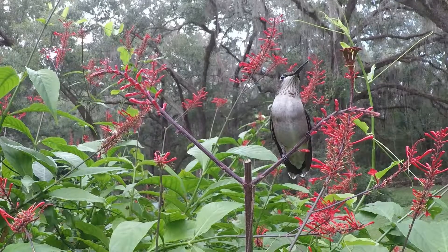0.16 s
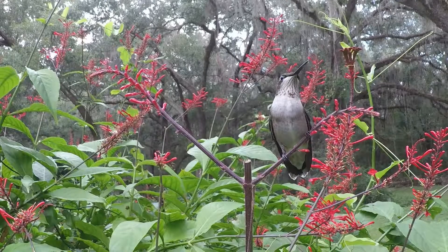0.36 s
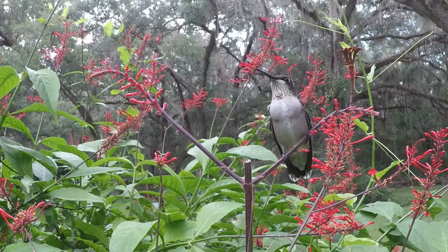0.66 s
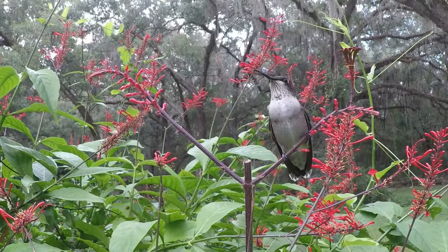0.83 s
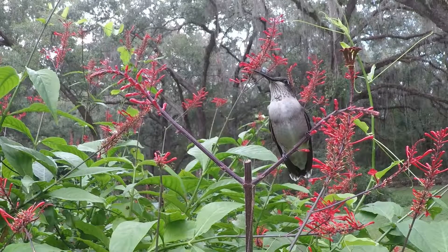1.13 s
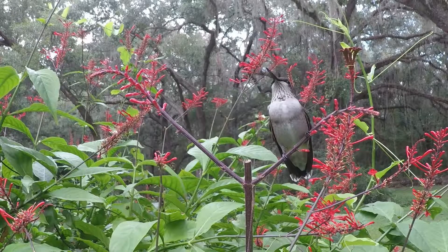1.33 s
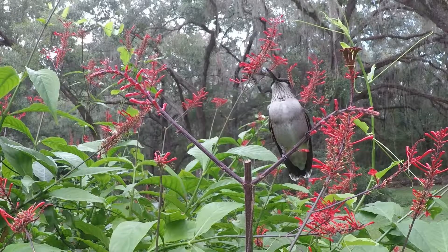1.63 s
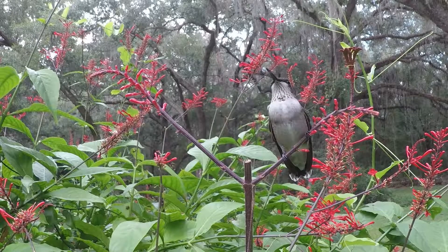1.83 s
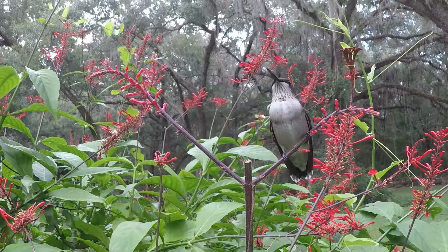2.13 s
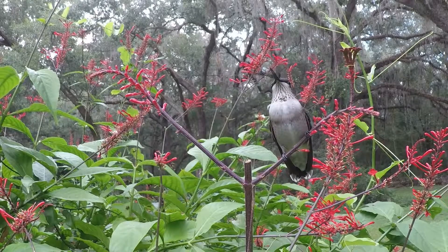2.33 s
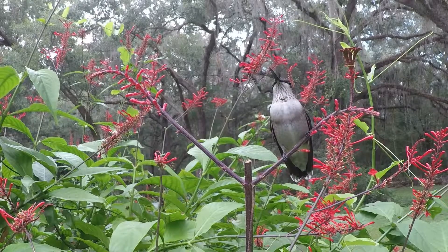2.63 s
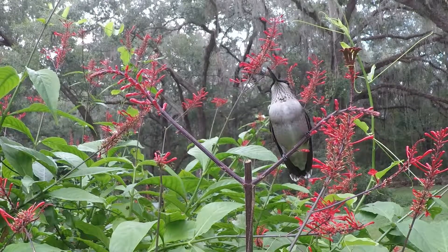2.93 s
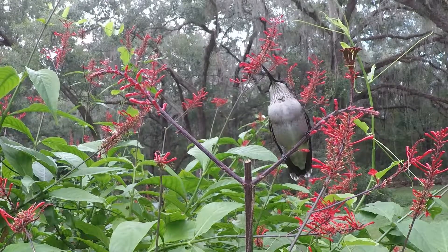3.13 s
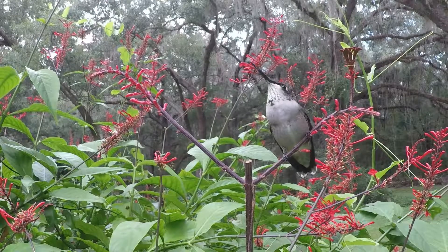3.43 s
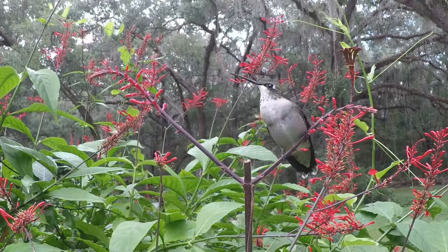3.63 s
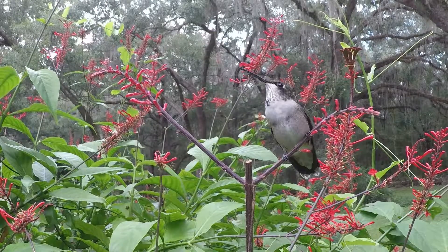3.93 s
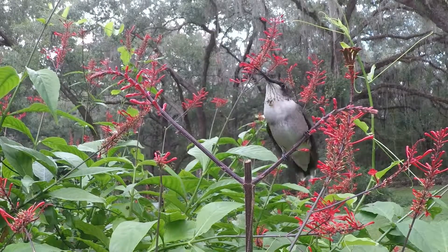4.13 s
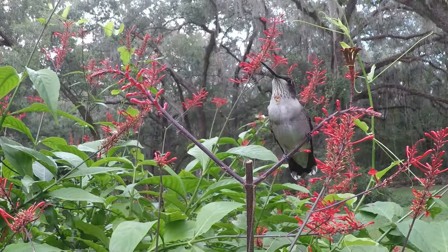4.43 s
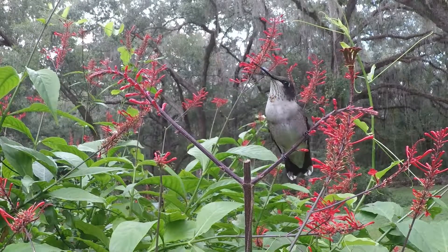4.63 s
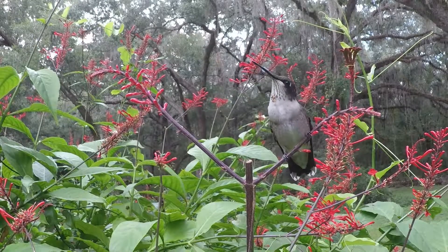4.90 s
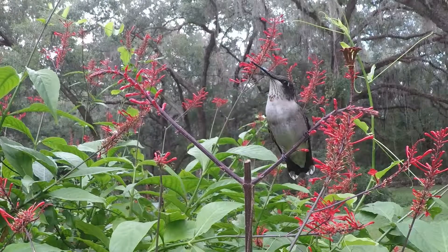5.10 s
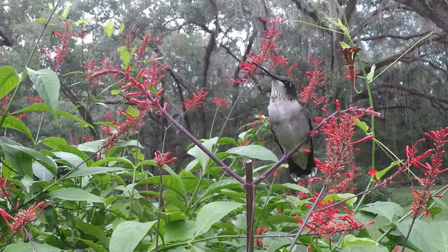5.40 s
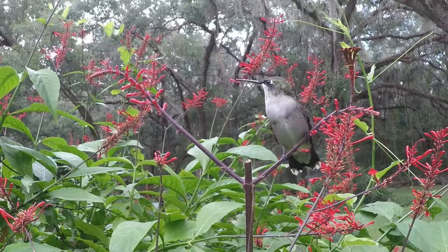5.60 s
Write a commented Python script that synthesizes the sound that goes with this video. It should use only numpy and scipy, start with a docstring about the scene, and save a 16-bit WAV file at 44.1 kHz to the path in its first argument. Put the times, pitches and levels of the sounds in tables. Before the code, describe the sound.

A deep, soft rumble of distant traffic with low hums and a thin hiss of leaves runs throughout, slightly stronger at first. From 0 to 1 s a faint low engine note rises and fades. Barely audible far birds give thin high whistles and small chips from 0.15 to 1.4 s; a soft hollow wooden double or triple knock sounds far off near 1.15 s. More faint, echoing whistles, a small trill and chips come between 1.9 and 3.05 s. At 3.3 s the close hummingbird suddenly dominates: two very short piercing squeaks, falling at their ends. After a pause, at 3.8 s comes another squeak, a quick rough trill, two falling buzzes around 4.0 and 4.07 s, then five crisp descending chips from 4.14 to 4.4 s. They are dry with slight leafy and woodland echo. Another engine rise lasts from 4 to 5.5 s, with one almost inaudible far whistle at 5.25 s.

```python
"""Hummingbird on a twig

A nearby hummingbird whistles, trills, buzzes and chips; others answer from farther off. Each note is a
pitch curve sung by a stack of overtones, coloured by a throat and echoed by leaves and trees.
Shaped noise makes distant traffic and leaf hiss, sine tones make two hums and an engine that twice pulls
up in pitch, and short ringing tones make something wooden knock far away."""
import sys
import numpy as np
from scipy import signal
from scipy.fft import rfft, irfft
from scipy.io import wavfile
from scipy.ndimage import uniform_filter1d

SR = 44100
rng = np.random.default_rng(int(sys.argv[2]) if len(sys.argv) > 2 else 0)


def master_out(mix):
    """Clip the mix to full scale and print it as 16-bit PCM to the path in sys.argv[1]."""
    frames = np.transpose(np.atleast_2d(mix))
    ceiling = np.clip(frames, -1, 1)
    pcm = np.round(ceiling * 32767).astype(np.int16)
    wavfile.write(sys.argv[1], SR, pcm)


N = 254016  # length in samples
EDGE_HZ = 14640  # top of the sound band


def gain_of(db):
    """Turn decibels into a multiplier."""
    return 10 ** (np.asarray(db) / 20)


def evened(x):
    """Scale to an rms of 1."""
    return x / np.sqrt(np.mean(x ** 2) + 1e-20)


def read(points, hz):
    """Read a curve between its points, on a logarithmic frequency scale."""
    f, value = np.transpose(points)
    return np.interp(np.log(hz + 1), np.log(f + 1), value)


def add(mix, s, sound):
    """Lay a sound into the mix at time s, cut off at the end of the mix."""
    part = mix[..., round(s * SR):][..., :sound.shape[-1]]
    part += sound[..., :part.shape[-1]]


def wander(count, size):
    """Slow random drift of rms 1, smooth over size samples."""
    smooth = uniform_filter1d(rng.standard_normal(count), size)
    return evened(uniform_filter1d(smooth, size))


def echoes(x, t60, gap_s):
    """Dense scattered echoes as fading noise after a short gap, different in each ear."""
    t = np.arange(SR // 2) / SR
    tail = rng.standard_normal((2, len(t))) * gain_of(-60 * t / t60) * (t > gap_s)
    tail /= np.linalg.norm(tail, axis=1, keepdims=True)
    return signal.fftconvolve(x[None], tail, axes=1)[:, :N]


def grove(x):
    """Echoes off the trees, which take 0.45 s to die away by 60 dB."""
    return echoes(x, t60=0.45, gap_s=0.0015)


# How alike the rumble is at two microphone ports close together: f/Hz, likeness (0-1)
PORT_LIKENESS = [(60, .9995), (250, .985), (500, .88), (1000, .72), (1500, .55), (2400, .2), (14000, .1)]
# How far the left port is ahead (negative: behind): f/Hz, lead/rad
PORT_LEAD = [(30, -.05), (90, -.09), (180, -.2), (360, -.4), (600, -.75), (950, -3.3), (1550, -4),
             (2500, -5)]
# How much louder the left port is than the right: f/Hz, level/dB
PORT_BALANCE = [(60, -1.0), (110, -1.0), (200, -1.5), (370, -4.0), (680, -10.0), (1240, -5.5), (2280, -0.5),
                (4180, -0.5), (7660, -0.5), (14000, -1.0)]


def ports(z, other, hz):
    """One sound field as two ports take it: partly shared, partly independent at each frequency."""
    same = np.clip(read(PORT_LIKENESS, hz), 0, 1)
    side = gain_of(read(PORT_BALANCE, hz) / 2)
    shared = same * z * np.exp(-1j * read(PORT_LEAD, hz))
    right = shared + np.sqrt(1 - same ** 2) * other
    return np.array([z * side, right / side])


# Tone colour of the traffic and leaf hiss, before its overall level is set: f/Hz, level per Hz/dB
RUMBLE_COLOUR = [(12, -36), (28, -8), (48, 1), (70, -3), (105, -6), (165, -17), (300, -21), (500, -24.5),
                 (720, -34.5), (1100, -40), (2000, -52), (3400, -60), (9700, -60.5), (14500, -72.5)]
# Faint steady bands, likely insects: f/Hz, width/Hz, level over the hiss/dB
WHINES = [(2300, 120, 4), (4500, 150, 3), (6400, 900, 2)]
# Slow swells, each taken about its own average: t/s, deep rumble level/dB, traffic wash level/dB
SWELLS = [(0, 2, 1), (1.5, 1, .5), (3, -1, 0), (4.5, 0, -.5), (5.76, -2, -.5)]
RUMBLE_DB = -22


def rumble(patchy_db=0.31):
    """Far traffic and the hiss of leaves: random short-time spectra with faint patches and slow swells."""
    hop = 512  # samples between spectra
    frames, hz = N // hop + 5, np.fft.rfftfreq(2048, 1 / SR)[:, None]
    a, b, c, d, patches = rng.standard_normal((frames, 1025, 5)).T
    patches = uniform_filter1d(patches, size=20, axis=0)  # smooth over frequency
    patches = evened(uniform_filter1d(patches, size=6, axis=1))  # smooth over time
    s, *levels = np.transpose(SWELLS)
    frame_s = np.arange(frames) * hop / SR
    deep_db, wash_db = (np.interp(frame_s, s, v - v.mean()) for v in levels)
    deep = 1 / (1 + (hz / 110.) ** 2)  # share that follows the deep swell
    swell_db = deep * deep_db + (1 - deep) * wash_db / (1 + (hz / 6900.0) ** 2)
    whine_db = sum(db * np.exp(-((hz - f) / width) ** 2) for f, width, db in WHINES)
    colour_db = read(RUMBLE_COLOUR, hz) + whine_db + swell_db + patchy_db * patches
    z = ports(a + 1j * b, c + 1j * d, hz) * gain_of(colour_db)
    noise = signal.istft(z, nperseg=2048, noverlap=2048 - hop)[1][:, :N]
    return gain_of(RUMBLE_DB) * evened(noise)


# Two hums, before their levels waver: f/Hz, level/dB, phase drift (rms)/rad
HUMS = [(59.28, -31, 1), (48.12, -31, 2.85)]
# The engine pulls up, before fading and wavering: t/s, length/s, start f/Hz, end f/Hz, level/dB
ENGINE_PULLS = [(0, 0.957, 102.6, 122.8, -26), (4.0, 1.5, 100.5, 119.4, -26)]
PULL_RISE_S, PULL_FADE_DB, PULL_WAVER_DB = 0.12, -10.5, 2  # edge time, level change by the end, rms waver


def drones():
    """Sine tones: two wavering hums and the engine's rising, fading note."""
    t, out = np.arange(N) / SR, np.zeros(N)
    for hz, db, drift in HUMS:
        level = gain_of(db + 1.9 * wander(N, size=6000))
        out += level * np.sin(2 * np.pi * hz * t + drift * wander(N, size=9000))
    for s, length, hz0, hz1, db in ENGINE_PULLS:
        part = np.arange(0, length, 1 / SR)
        u = part / length
        level_db = db + PULL_FADE_DB * u ** 2 + PULL_WAVER_DB * wander(len(part), size=4000)
        edges = np.clip(np.minimum(part, part[::-1]) / PULL_RISE_S, 0, 1)
        turns = np.cumsum(hz0 + (hz1 - hz0) * u) / SR
        add(out, s, gain_of(level_db) * edges * np.sin(2 * np.pi * turns))
    return np.sqrt(2) * out * gain_of([[-.45], [.45]])  # left, right


# Where each bird sits and how that changes its notes. Columns: echo level/dB, left-right level/dB,
# brightness/dB per octave, share of the throat's colour heard, level change over a whistle's plunge/dB,
# end of a chip as share of its start pitch, bend of a chip's fall (0 = straight)
BIRDS = {"near": (-22.5, 1, 0, 1, -4, 0.53, 0.72), "middle": (-3.5, 3, 4, 0.84, -22, 0.53, -0.25),
         "far": (1.5, 1, 6, 1, -22, .76, -0.3)}
# Strength of each overtone of the vibrating membrane, lowest first: level/dB
OVERTONES_DB = [1, -5.5, -6.5, -11.5, -17.5, -18, -19, -25]
# How the windpipe and beak colour the tone: f/Hz, level/dB
THROAT = [(1200, -23), (1900, -18), (2600, -11), (4000, -13), (5400, -10), (6300, -1.5), (6700, 0),
          (7500, -4.5), (8200, -18), (8900, -15), (9600, -14), (10500, -29), (12800, -15.5), (14500, -43)]
THROAT_TOP_HZ = 6700  # brightness tilts about the throat's peak
GRAIN = .018  # fine random grain on every note's level, share of the tone


def voice(hz, db, bird, rise_s=0.0021, fall_s=0.0021):
    """Overtones of a membrane follow the pitch curve, each coloured by the throat it passes.
    Fast random level changes roughen it a little; moving air makes far notes waver."""
    echo_db, _, bright_db, colour = BIRDS[bird][:4]
    count, far = len(hz), gain_of(echo_db)
    t = np.arange(count) / SR
    speed = uniform_filter1d(abs(np.gradient(np.log(hz))) * SR, size=60)  # quick slides roughen the tone
    shake = (0.0029 + .00006 * speed) * wander(count, size=12)
    air = .012 * far * wander(count, size=250)
    turns = np.cumsum(hz * (1 + shake + air)) / SR
    tones = np.zeros(count)
    for k, over_db in enumerate(OVERTONES_DB, 1):
        tilt_db = bright_db * np.log2(k * hz / THROAT_TOP_HZ)
        level = gain_of(over_db + colour * read(THROAT, k * hz) + tilt_db)
        tones += level * (k * hz < EDGE_HZ) * np.sin(2 * np.pi * k * turns)
    rough = .025 * np.sqrt(speed / 30.) * wander(count, size=6)
    tones *= 1 + rough + GRAIN * wander(count, size=2)
    edges = np.sin(np.pi / 2 * np.clip(np.minimum(t / rise_s, t[::-1] / fall_s), 0, 1)) ** 2
    waver_db = (0.14 + 3.7 * far) * wander(count, size=200)
    return np.sqrt(2) * gain_of(db + waver_db) * edges * tones


# Instants at which the voice catches: t/s, level change/dB
CATCHES = [(3.3472, -14), (3.8145, -8)]
CATCH_S = .0001  # width of a catch
PLUNGE_S, PLUNGE_HZ = .008, 1600  # how long a whistle's end takes and where it lands
# Held notes that plunge at the end, with start levels before colouring:
# t/s, bird, length/s, start f/Hz, end f/Hz, sag in the middle/Hz, level/dB, growth/dB
WHISTLES = [(.153, "far", 0.087, 6740, 6850, -1, -57.5, -0.5), (.317, "far", .077, 6580, 6420, 0, -63, 0),
            (0.93, "far", .062, 6450, 6290, 0, -63.5, 2), (1.893, "middle", 0.056, 7000, 7130, 0, -51, 4.5),
            (2.08, "middle", .02, 6900, 6680, 0, -58.5, 4.5),
            (3.3205, "near", 0.034, 6660, 6120, -73, -16, 3.5),
            (3.408, "near", .0305, 6510, 5640, -110, -18, 0.5),
            (3.8042, "near", 0.025, 6660, 6130, 295, -18.5, 5.5),
            (5.251, "far", 0.14, 6800, 7080, 0, -66.5, -2)]


def whistle(s, bird, length, hz0, hz1, sag_hz, db, growth_db):
    """A gliding tone; then the membrane slackens and the pitch falls away."""
    t = np.arange(0, length + PLUNGE_S, 1 / SR)
    u = np.minimum(t / length, 1)
    slack = np.clip((t - length) / PLUNGE_S, 0, 1)
    held_hz = hz0 + (hz1 - hz0) * u - 4 * sag_hz * u * (1 - u)
    hz = PLUNGE_HZ + (held_hz - PLUNGE_HZ) * (1 - slack) ** 2.1
    catch_db = sum(dip_db * np.exp(-((s + t - at) / CATCH_S) ** 2) for at, dip_db in CATCHES)
    plunge_db = BIRDS[bird][4] * np.sqrt(slack)
    return s, bird, voice(hz, db + growth_db * u + plunge_db + catch_db, bird)


# Short falling notes, with start levels before colouring: t/s, bird, length/s, start f/Hz, level/dB
CHIPS = [(.386, "far", .014, 2610, -54), (.47, "far", .016, 2500, -51), (.539, "far", .013, 2600, -51),
         (.655, "far", .013, 2650, -54), (.845, "far", .013, 2500, -55), (1.093, "far", .016, 2750, -51),
         (1.153, "far", .014, 2750, -52), (1.211, "far", .014, 2800, -52), (1.276, "far", .014, 2600, -54),
         (1.341, "far", .014, 2600, -54), (1.411, "far", .014, 2450, -56),
         (2.296, "middle", 0.016, 2600, -52), (2.348, "middle", .015, 2600, -52),
         (2.402, "middle", .016, 2680, -49), (2.756, "middle", 0.02, 2650, -45),
         (2.809, "middle", 0.022, 2730, -45), (2.874, "middle", .018, 2700, -44),
         (2.945, "middle", 0.018, 2690, -46), (3.031, "middle", 0.012, 2420, -50),
         (4.136, "near", 0.018, 2500, -14), (4.189, "near", 0.018, 2524, -14),
         (4.244, "near", .019, 2394, -14.5), (4.3073, "near", .019, 2360, -14),
         (4.3774, "near", 0.018, 2324, -14.5)]


def chip(s, bird, length, hz0, db):
    """A low falling note rich in overtones; positive bend steepens its start and end, negative its middle."""
    end, bend = BIRDS[bird][5:]
    u = np.arange(0, length, 1 / SR) / length
    bent = .66 * np.exp(-u / .13) + .34 * (1 - u ** 4)
    fall = (1 - bend) * (1 - u) + bend * bent
    hz = hz0 * (end + (1 - end) * fall)
    return s, bird, voice(hz, db - 1.6 * u, bird, rise_s=0.0042, fall_s=0.003)


def warble(kind, s, bird, length, rate1, done, top0, top1, low0, low1, db):
    """The membrane's pitch swings ever slower between a sinking top and bottom."""
    rate0, round_top, growth_db, swell_db = kind
    u = np.arange(0, length, 1 / SR) / length
    swing = (done + np.cumsum(rate0 + (rate1 - rate0) * u ** 2) / SR) % 1
    zigzag = 1 - abs(2 * swing - 1)
    arches = 1 - (1 - zigzag) ** 2.3  # round tops, sharp dips
    height = (1 - round_top) * zigzag + round_top * arches
    top, low = top0 + (top1 - top0) * u, low0 + (low1 - low0) * u
    hz = low + (top - low) * uniform_filter1d(height, size=round(SR / rate0 / 12))
    return s, bird, voice(hz, db + growth_db * u + swell_db * np.sin(np.pi * u), bird)


# How a buzz swings: start rate/swings per s, roundness of the tops (0 = pointed), growth/dB, middle swell/dB
BUZZ_SWING = (241, .1, 1.3, .6)
# Fast swinging notes, with levels before growth, swell and colouring: t/s, bird, length/s,
# end rate/swings per s, share of a swing done at the start, top f/Hz at start, at end,
# bottom f/Hz at start, at end, level/dB
BUZZES = [(.735, "far", .03, 220, .4, 7700, 7100, 6300, 5600, -62.5),
          (2.67, "middle", .038, 200, .3, 5500, 5200, 4820, 3900, -58),
          (3.9968, "near", .033, 201.5, -0.163, 5250, 3440, 2367, 1790, -16.5),
          (4.0713, "near", 0.028, 161, 0.1, 4880, 2440, 2250, 1490, -17.5)]


def buzz(*row):
    """A pitch that zigzags so fast that it is heard as a buzz."""
    return warble(BUZZ_SWING, *row)


# Blows on something wooden: t/s, level/dB
KNOCKS = [(1.125, -38), (1.161, -28), (1.178, -32.5)]
# Hollow tones that each blow rings: f/Hz, level/dB, time to fade by 60 dB/s
KNOCK_MODES = [(540, 1, 0.13), (600, 0, .07), (675, 3.5, 0.048), (796, 2.5, 0.043), (934, 1.5, 0.044)]


def knocks(echo_db=-3., rise_s=.003):
    """Soft blows ring a few hollow modes, smeared by the trees."""
    t, out = np.arange(SR // 4) / SR, np.zeros(N)
    rise = np.sin(np.pi / 2 * np.minimum(t / rise_s, 1)) ** 2
    for s, db in KNOCKS:
        ring = sum(gain_of(mode_db - 60 * t / t60) * np.sin(2 * np.pi * (hz * t + rng.random()))
                   for hz, mode_db, t60 in KNOCK_MODES)
        add(out, s, gain_of(db) * ring * rise)
    return (out + gain_of(echo_db) * grove(out)) * gain_of([[-5.], [3.]])  # left, right


# How a trill swings: start rate/swings per s, roundness of the tops (0 = pointed), growth/dB, middle swell/dB
TRILL_SWING = (92.5, 1.2, -4, 8)
# Slower swinging notes, with the same columns as the buzzes: t/s, bird, length/s,
# end rate/swings per s, share of a swing done at the start, top f/Hz at start, at end,
# bottom f/Hz at start, at end, level/dB
TRILLS = [(2.501, "middle", 0.066, 68, .25, 6980, 6650, 6470, 5200, -56.5),
          (3.864, "near", 0.07, 72, .145, 6740, 6360, 4710, 1250, -19.5)]


def trill(*row):
    """A pitch that swings in arches with sharp dips."""
    return warble(TRILL_SWING, *row)


# How much louder the birds are at the left port: f/Hz, level/dB
PERCH_BALANCE = [(1500, -2.5), (3000, -3), (4500, 0.5), (6500, 3.5), (9000, -5.5), (13000, -1)]
# How far the left port is ahead for the birds: f/Hz, lead/rad
PERCH_LEAD = [(3000, 0.2), (6500, 0.34), (7500, 1.86), (9000, 0.59), (12000, 0.57)]
BUSH_T60, BUSH_DB = .035, -13  # leaves right around a bird: echo fade in s, level in dB
LOWEST_HZ = 1150  # so small a body radiates little below this


def birds():
    """Every note straight to the microphones, off the leaves close by, and off the trees."""
    direct, to_trees = np.zeros((2, N)), np.zeros(N)
    notes = [whistle(*r) for r in WHISTLES] + [trill(*r) for r in TRILLS]
    notes += [buzz(*r) for r in BUZZES] + [chip(*r) for r in CHIPS]
    for s, bird, sound in notes:
        echo_db, pan_db = BIRDS[bird][:2]
        add(direct, s, sound * gain_of([[pan_db / 2], [-pan_db / 2]]))
        add(to_trees, s, sound * gain_of(echo_db))
    hz = np.fft.rfftfreq(N, 1 / SR)
    left = gain_of(read(PERCH_BALANCE, hz) / 2) * np.exp(.5j * read(PERCH_LEAD, hz))
    straight = irfft(rfft(direct) * [left, 1 / left], N)
    bush = gain_of(BUSH_DB) * echoes(direct.mean(0), BUSH_T60, gap_s=0.00072)
    no_lows = signal.butter(6, LOWEST_HZ, "high", fs=SR, output="sos")
    return signal.sosfilt(no_lows, straight + bush + grove(to_trees))


def scene():
    """All the sources together."""
    return birds() + rumble() + drones() + knocks()


def record(dry):
    """A soft start and end, then the band limit."""
    n = np.arange(N)
    soft = dry * np.minimum(np.minimum(n, n[::-1]) / 200, 1)
    longer = np.pad(soft, ((0, 0), (255, 255)), mode="constant")  # room for the filter's delay
    low_pass = signal.firwin(511, EDGE_HZ, window=("kaiser", 9), fs=SR)
    return signal.oaconvolve(longer, low_pass[None], "valid")


dry = scene()
out = record(dry)
master_out(out)
```